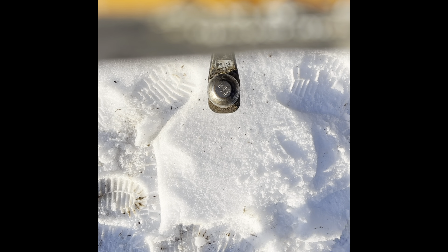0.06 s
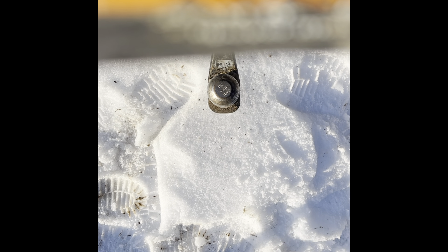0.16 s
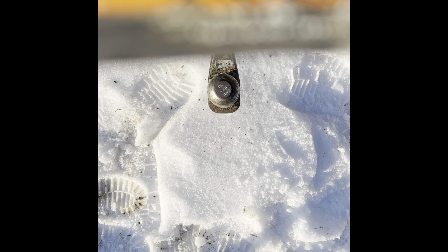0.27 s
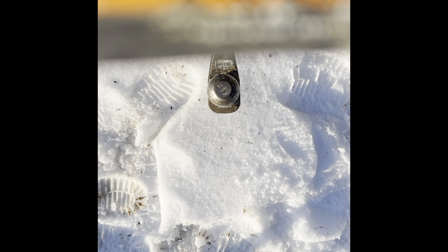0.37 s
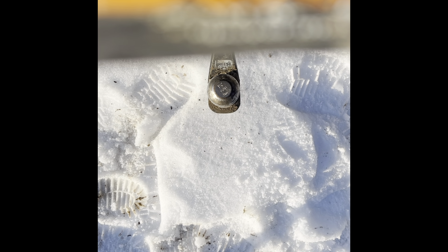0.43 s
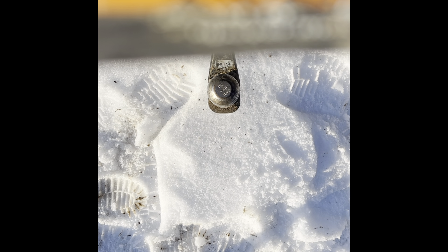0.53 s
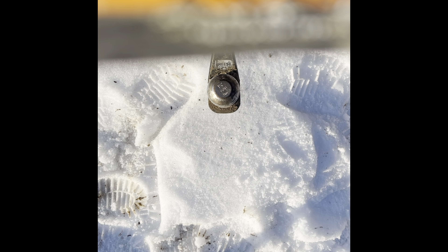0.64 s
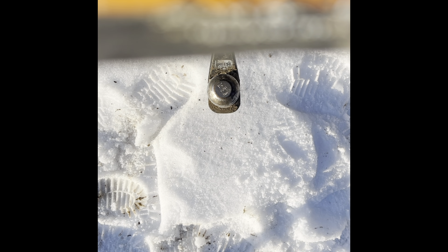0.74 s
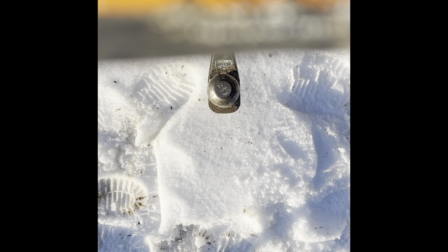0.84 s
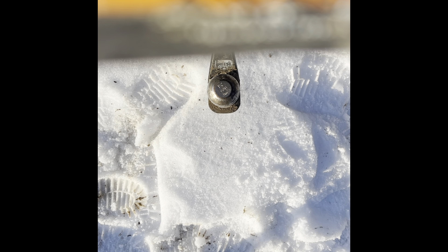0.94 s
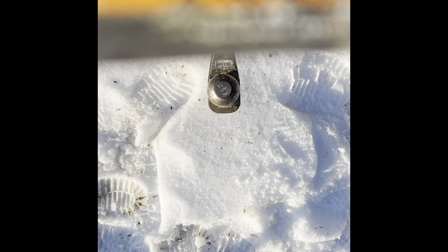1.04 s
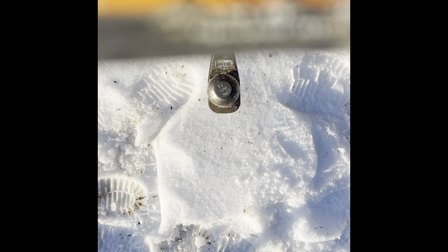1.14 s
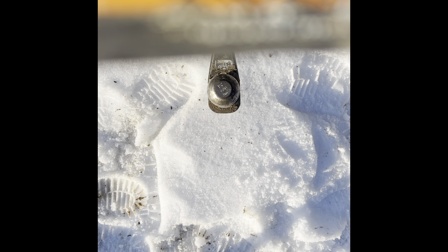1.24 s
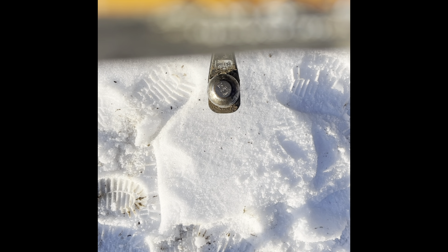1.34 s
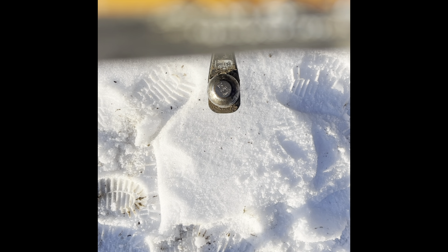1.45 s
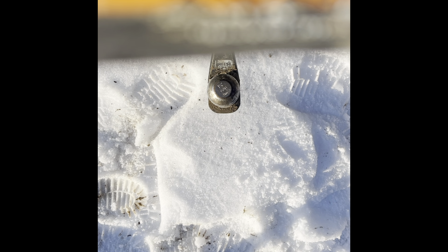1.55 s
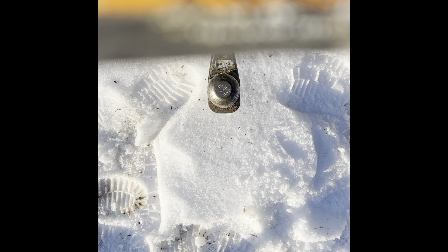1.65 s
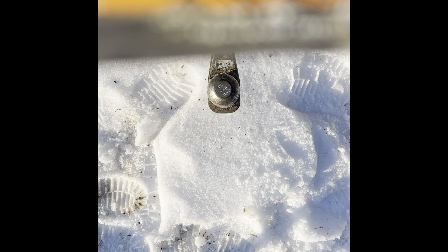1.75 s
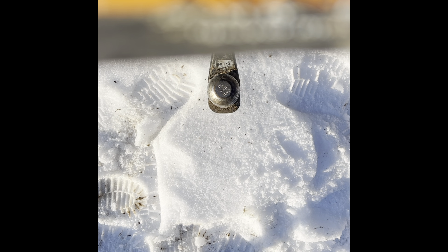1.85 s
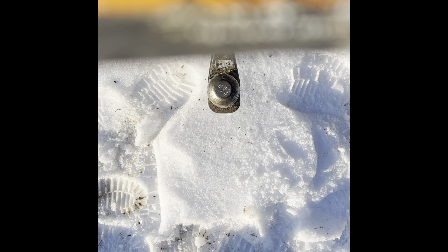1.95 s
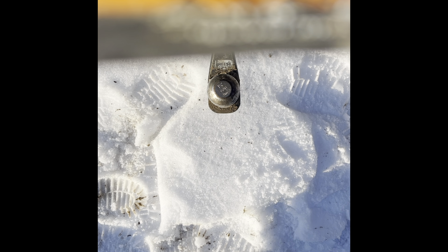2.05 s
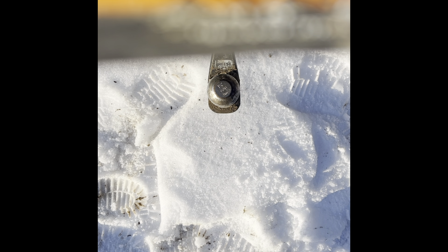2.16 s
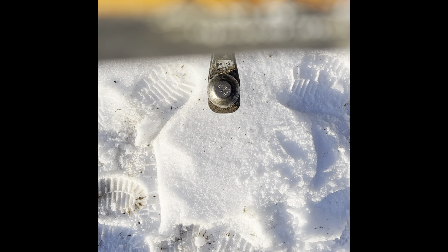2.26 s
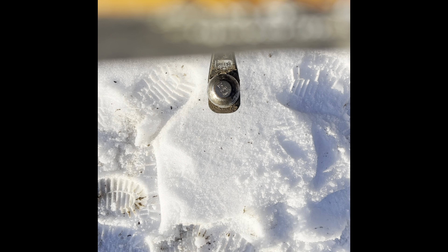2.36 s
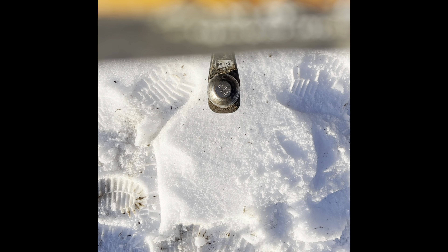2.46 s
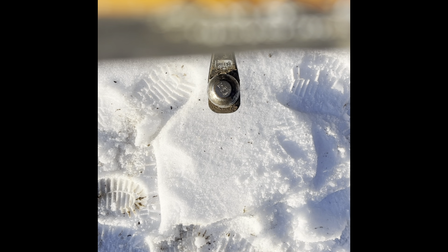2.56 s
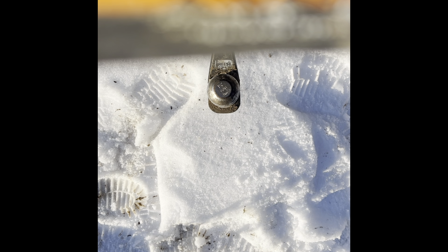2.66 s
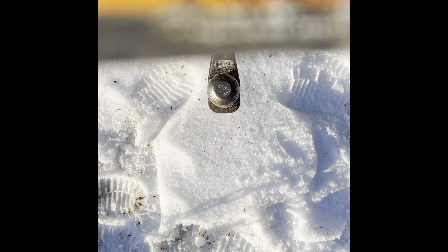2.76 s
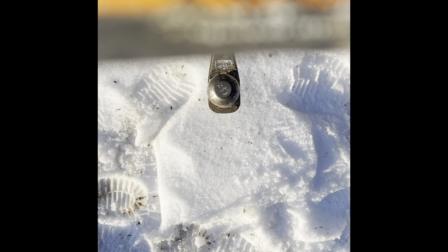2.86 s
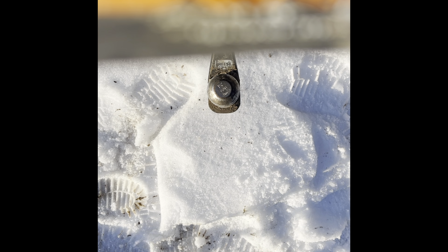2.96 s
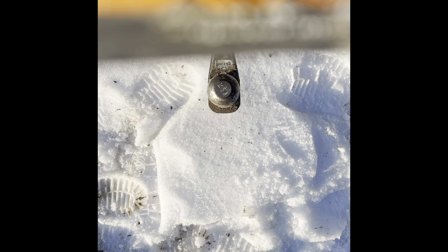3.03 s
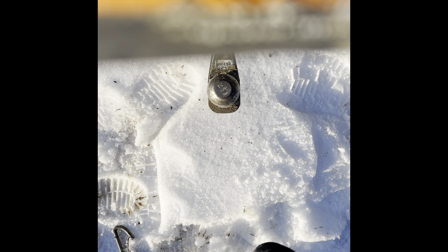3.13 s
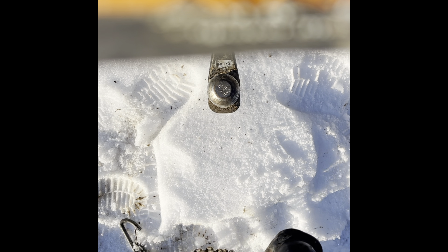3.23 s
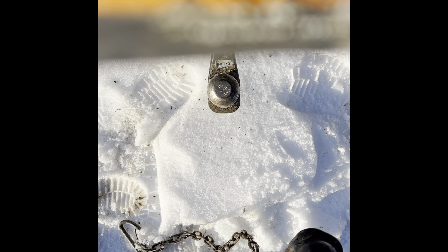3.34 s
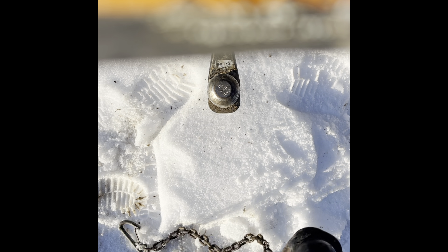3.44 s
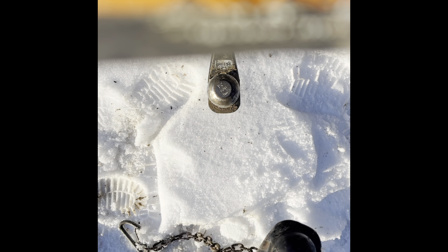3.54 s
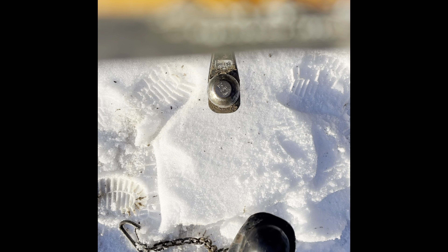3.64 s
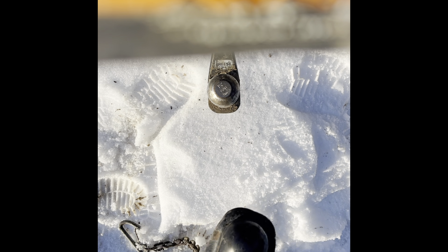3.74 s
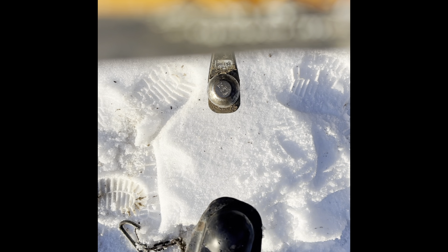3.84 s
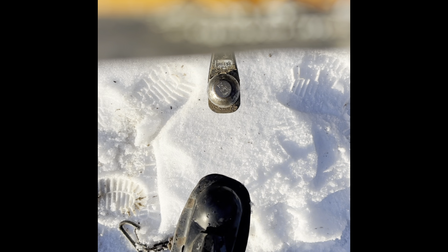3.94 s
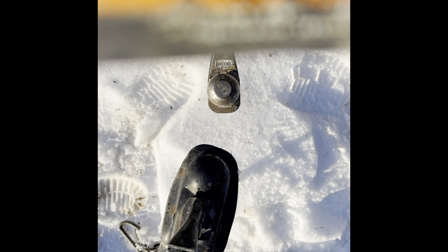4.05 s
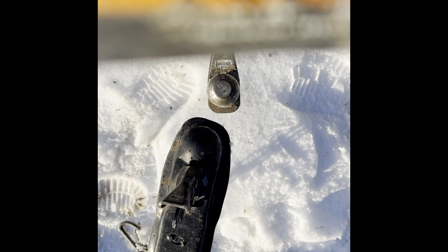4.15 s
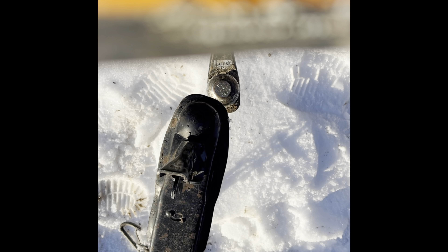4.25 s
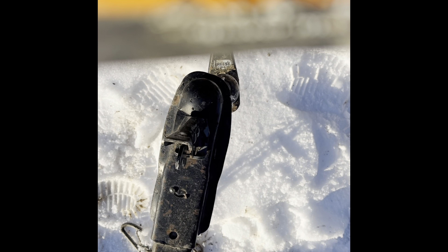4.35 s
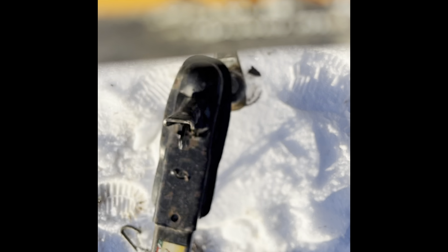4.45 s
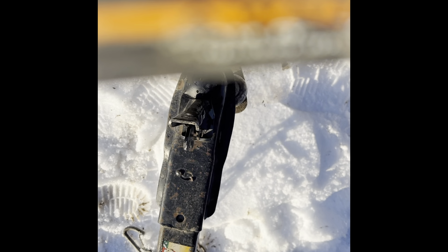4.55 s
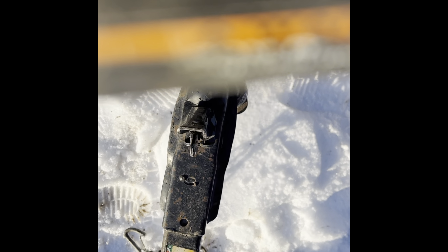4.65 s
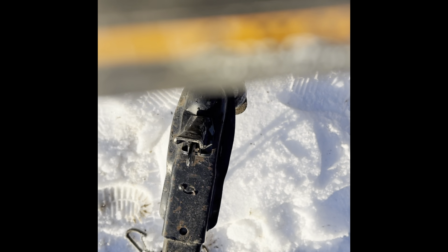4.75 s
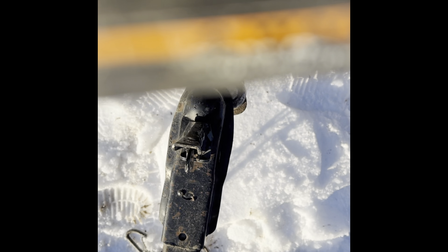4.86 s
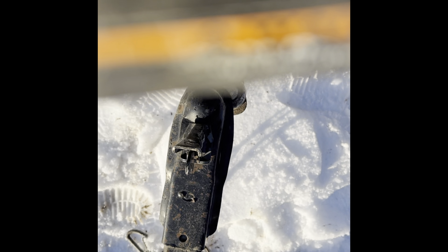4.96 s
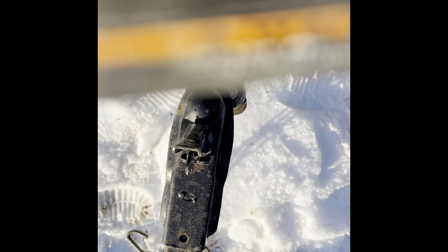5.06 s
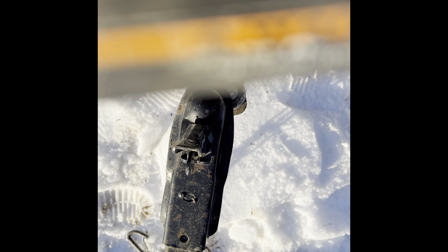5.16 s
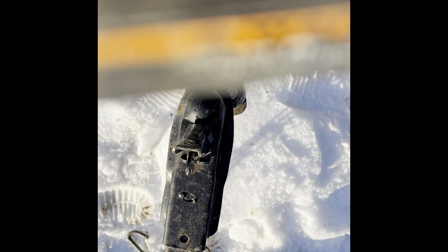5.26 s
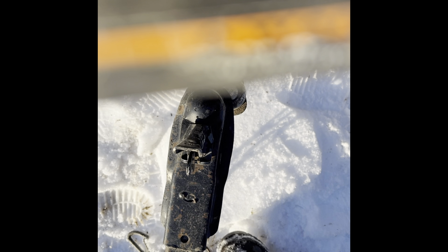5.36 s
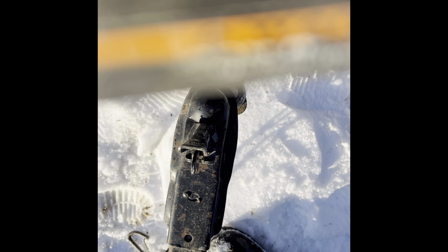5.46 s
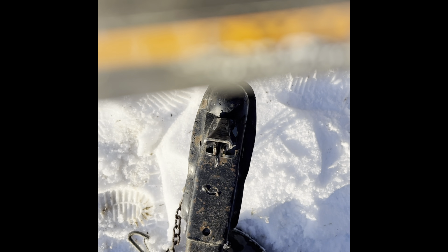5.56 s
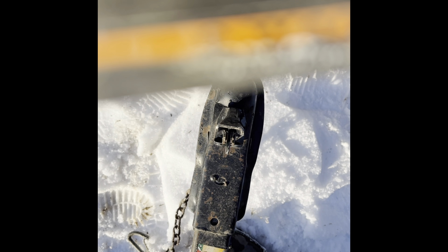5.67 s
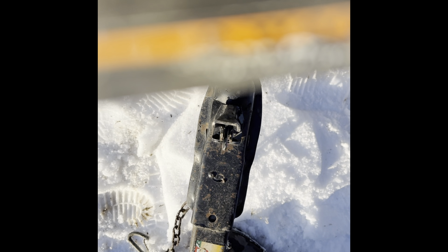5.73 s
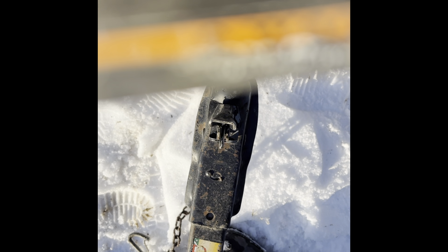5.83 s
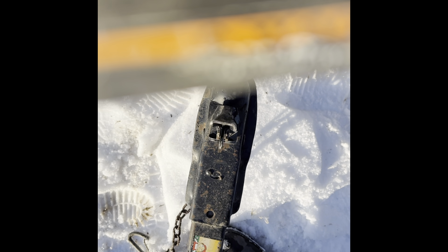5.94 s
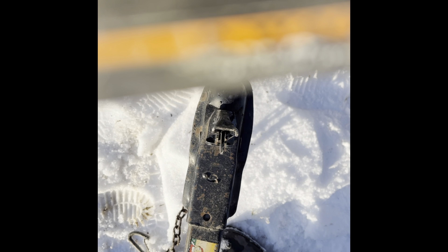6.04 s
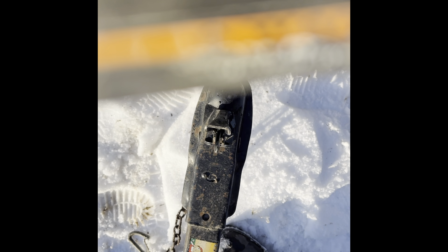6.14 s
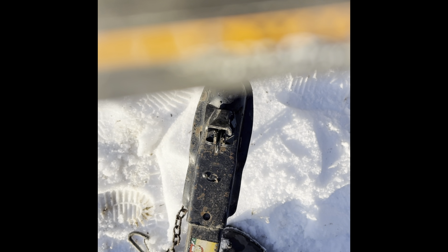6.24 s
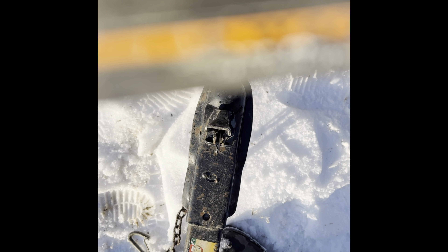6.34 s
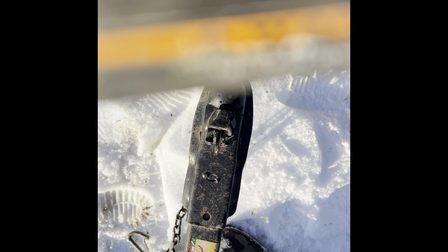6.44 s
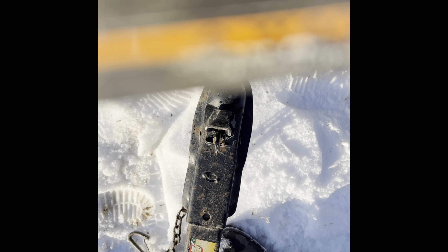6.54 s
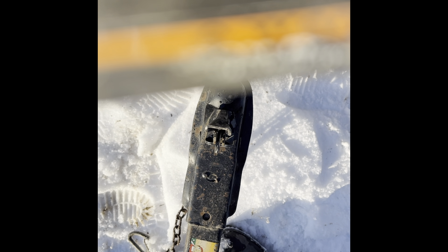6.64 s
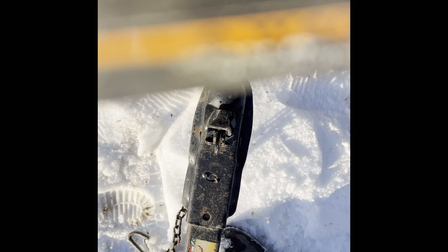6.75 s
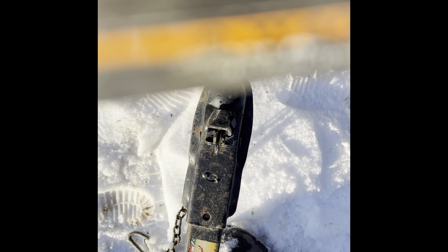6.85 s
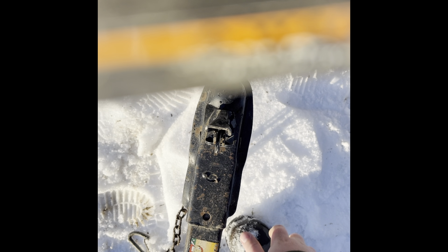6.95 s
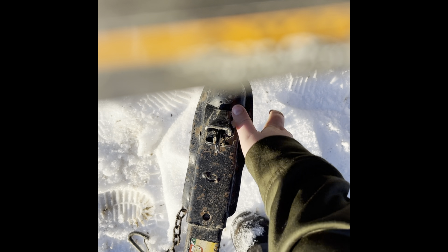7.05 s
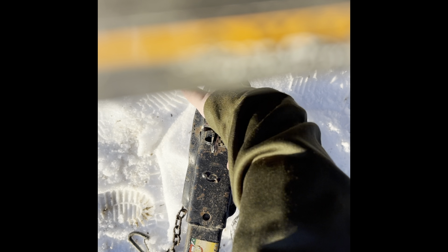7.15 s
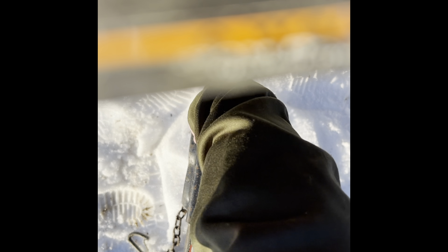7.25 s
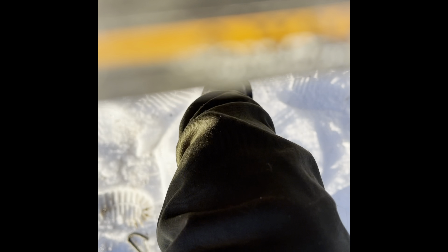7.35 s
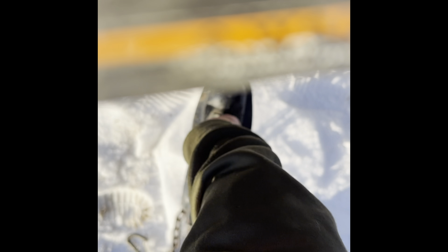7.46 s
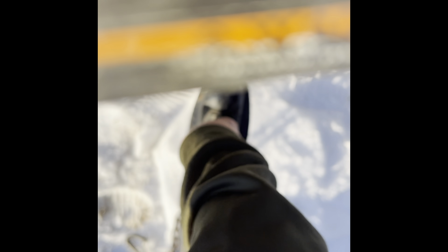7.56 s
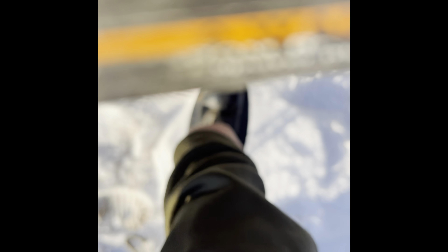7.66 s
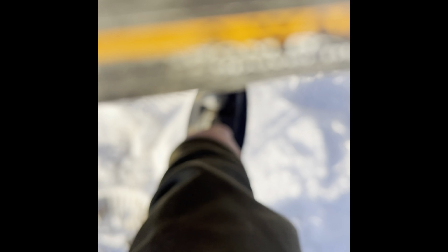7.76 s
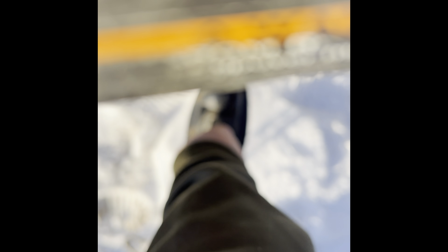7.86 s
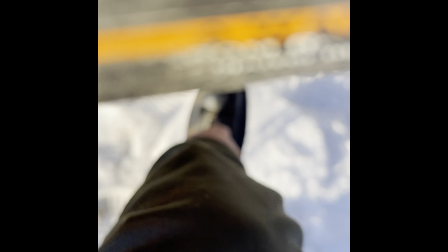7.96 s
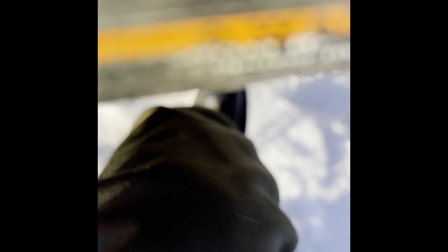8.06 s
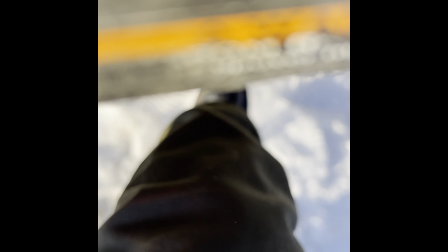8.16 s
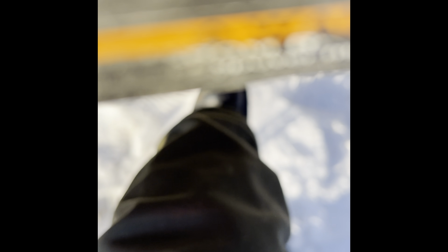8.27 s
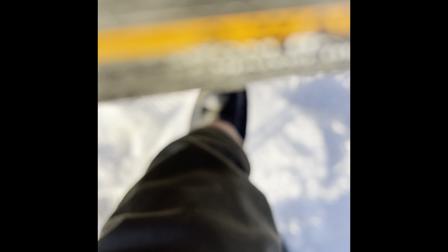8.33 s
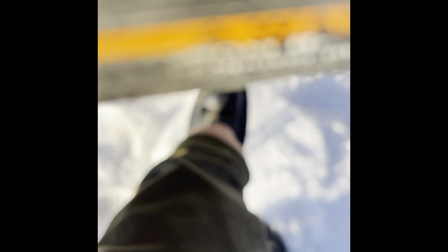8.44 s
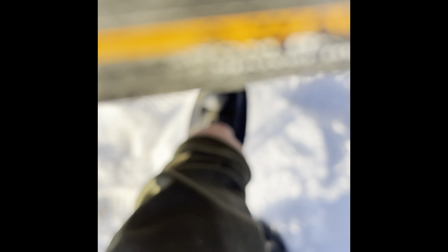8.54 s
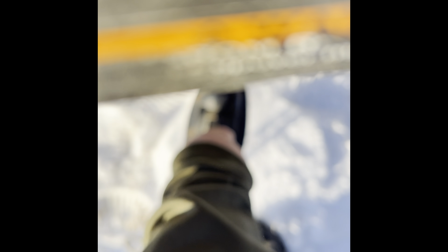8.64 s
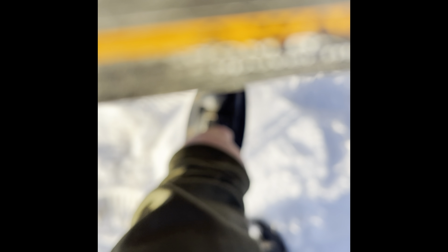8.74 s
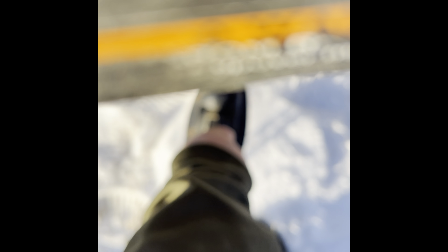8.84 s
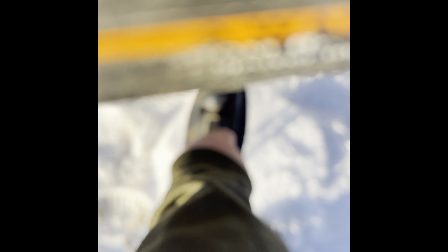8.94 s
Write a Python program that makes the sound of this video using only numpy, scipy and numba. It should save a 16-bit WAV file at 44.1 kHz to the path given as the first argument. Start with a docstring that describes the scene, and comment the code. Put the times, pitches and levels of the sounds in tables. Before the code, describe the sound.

A small trailer is coupled on snowy ground, heard close by. First come uneven snow crunches, soft swishes and light chain ticks. Then thick, hollow steel bangs arrive in a rapid tumble, booming briefly in the frame. After a quiet gap, metal grates and drops hard. Later, cloth brushes and the latch scrapes and clacks shut, amid faint air and low wind thumps.

```python
"""Coupling a trailer in snow

A small trailer is dragged over snow, its chain clinking; the steel coupler knocks, scrapes and drops onto the
hitch ball, then the latch is pushed shut. Steel is impulse-driven damped modes, soft pops and short noise;
grating steel is random slips through resonances. Boots and sleeves swish and crunch as coloured grains, and
wind rumbles on the microphone as slowly varying noise."""
import sys
import numpy as np
from scipy import signal
from scipy.fft import rfft, irfft
from scipy.io import wavfile
from scipy.ndimage import uniform_filter1d
from numba import njit

SR = 44100
rng = np.random.default_rng(int(sys.argv[2]) if len(sys.argv) > 2 else 0)


def transcribe(u):
    """Save the signal u as a 16-bit wav file named by the first command-line argument.

    u: samples, shape (n,) or (channels, n), limited to [-1, 1]; the rate is SR.
    q: integer samples, one column per channel.
    """
    v = np.clip(np.atleast_2d(u).T, -1, 1)
    q = np.round(v * 32767).astype(np.int16)
    wavfile.write(sys.argv[1], SR, q)


N = 396900  # samples, 9 s


def amp(db):
    """Decibel law: 20 dB is a factor of ten in amplitude."""
    return 10 ** (np.asarray(db) / 20)


def rms_one(x):
    """Normalisation to unit root mean square."""
    return x / np.sqrt(np.mean(x ** 2) + 1e-20)


def in_time(rows):
    """Linear interpolation of each column over the time in the first column."""
    s, *columns = np.transpose(rows)
    return [np.interp(np.arange(N) / SR, s, column) for column in columns]


def at_hz(points, hz, column=1):
    """Interpolation of one column along a logarithmic frequency axis."""
    points = np.array(points)
    return np.interp(np.log(np.maximum(hz, 1)), np.log(points[:, 0]), points[:, column])


def colour(x, spectrum):
    """Linear filtering: shapes the spectrum; white input of rms 1 stays near rms 1."""
    gain = amp(at_hz(spectrum, np.fft.rfftfreq(N, 1 / SR)))
    return irfft(rfft(x) * rms_one(gain), N)


def band_pass(x, low_hz, high_hz):
    """Band limitation by a Butterworth filter."""
    return signal.sosfilt(signal.butter(2, [low_hz, high_hz], "band", fs=SR, output="sos"), x)


def high_pass(x, hz):
    """Removal of the low frequencies by a Butterworth filter."""
    return signal.sosfilt(signal.butter(2, hz, "high", fs=SR, output="sos"), x)


def drift(rate_hz):
    """Slow random fluctuation of rms 1: noise through a double pole, at a fortieth of the sample rate."""
    r = np.exp(-80 * np.pi * rate_hz / SR)
    noise = rng.standard_normal(N // 40 + 2002)
    slow = signal.lfilter([1], [1, -2 * r, r * r], noise)[2000:]  # skips the settling
    return np.interp(np.arange(N) / 40, np.arange(len(slow)), rms_one(slow))


def grains(per_s, spread_db):
    """Shot noise: random clicks of uneven size, rms 1."""
    sizes = amp(spread_db * np.minimum(rng.exponential(1, N), 4)) * rng.standard_normal(N)
    return rms_one(sizes * (rng.random(N) < per_s / SR))


def clicks(times, gains):
    """Ideal impulses on a negligible floor."""
    out = np.full(N, 1e-18)
    out[np.round(np.asarray(times) * SR).astype(int)] = gains
    return out


def ring(x, hz, t60):
    """Damped resonator: a unit click sets a sine of initial height 1 ringing."""
    r, w = amp(-60 / (t60 * SR)), 2 * np.pi * hz / SR
    return signal.lfilter([0, np.sin(w)], [1, -2 * r * np.cos(w), r * r], x)


def strike(times, db, modes, scatter_db):
    """Modal superposition: every contact drives every mode with a strength and sign of its own."""
    chance = rng.standard_normal((len(times), len(modes), 2))
    gains = amp(db[:, None] + scatter_db * chance[..., 0]) * np.sign(chance[..., 1])
    out = 0
    for k, (hz, level_db, t60) in enumerate(modes):
        out = out + amp(level_db) * ring(clicks(times, gains[:, k]), hz, t60)
    return out


def burst(times, db, spectrum, t60):
    """Exponentially decaying noise: grit crushed at the contact starts at once and dies fast."""
    envelope = signal.lfilter([1], [1, -amp(-60 / (t60 * SR))], clicks(times, amp(db)))
    return envelope * colour(rng.standard_normal(N), spectrum)


def add(out, s, sound):
    """Superposition of a sound from a given time on."""
    start = round(s * SR)
    out[start:start + len(sound)] += sound[:N - start]


def pop(db, hz, rise):
    """Soft-contact pulse: a few cycles that swell and fade."""
    t = np.arange(round(8 * rise * SR)) / SR
    return amp(db) * np.sin(2 * np.pi * hz * t) * t / rise * np.exp(1 - t / rise)


# wind on the microphone: t/s, level/dB
WIND = [(0, -50), (1.03, -43.5), (1.45, -52), (1.75, -45.5), (2.08, -49), (2.85, -45), (3.23, -45),
        (3.81, -45), (4.6, -49.5), (4.81, -31.5), (5.26, -45), (5.81, -35.5), (6.0, -47), (6.31, -48),
        (7.42, -43), (7.79, -50.5), (8.2, -31.5), (8.4, -43), (9, -44)]
# spectra of the rumble and of the faint air noise: f/Hz, relative level/dB
RUMBLE = [(12, -59), (20, -31), (38, -16), (59, 1.5), (162, -15), (258, -33), (285, -28), (400, -22),
          (520, -62.5), (880, -120)]
AIR = [(150, 7), (500, 7), (1000, 2), (2000, -7.5), (4000, -24.5), (9000, -16), (16000, -17)]
AIR_DB = -62


def wind():
    """Modulated low-frequency noise: a lumpy rumble over a faint steady air noise."""
    rumble_db = in_time(WIND)[0] + 2 * drift(23)
    rumble = colour(rng.standard_normal(N), RUMBLE) * amp(rumble_db)
    return rumble + amp(AIR_DB) * colour(rng.standard_normal(N), AIR)


# tyres and tongue pushing through snow, beneath the strokes: t/s, swish level/dB, crunch level/dB
DRAG = [(0, -63, -62), (.5, -73, -62), (1.0, -61, -48.5), (1.4, -93, -61.5), (1.8, -68, -55.5),
        (2.1, -64, -62.5), (2.6, -62, -50), (3.0, -45.5, -60), (3.45, -52.5, -49), (3.55, -69.5, -48.5),
        (4.05, -56.5, -44.5), (4.4, -58.5, -45), (5.05, -84, -45), (5.45, -55, -50), (6.2, -71.5, -47.5),
        (6.65, -68, -60.5), (7.5, -59, -51.5), (7.9, -74.5, -53.5), (8.3, -80.5, -43.5), (9, -74, -58)]
# boots and sleeves brushing through snow, one row a stroke:
# t/s, length/s, swish level/dB, crunch level/dB, change over the stroke/dB
STROKES = [(.045, .012, -51, -69, -6), (0.103, .16, -50, -50, 13), (0.263, .16, -42, -36, -11),
           (0.57, 0.04, -59, -62, -11), (0.656, 0.054, -42, -44, -8), (0.69, 0.13, -43.5, -40, -1),
           (0.843, 0.044, -40.5, -38.5, -12), (.94, 0.019, -33.5, -31, -10.5),
           (1.054, 0.065, -35.5, -36, -16), (1.248, 0.062, -44, -41.5, -4.5),
           (1.788, 0.023, -54.5, -41.5, -0.5), (1.821, 0.12, -45, -50.5, -16.5),
           (1.99, 0.17, -59.5, -57, -2.5), (2.256, 0.048, -50, -47, -7.5), (2.707, 0.13, -46, -42, -17.5),
           (2.826, .08, -63, -41.5, -5), (2.904, 0.098, -42, -48.5, 3.5), (3.018, 0.26, -41, -39, 0.5),
           (3.326, 0.083, -46.5, -41.5, -1), (4.005, 0.038, -46.5, -34.5, -5),
           (4.803, 0.16, -53, -29.5, -9), (5.225, .1, -55, -51.5, 4), (5.33, 0.08, -51, -46.5, 5),
           (6.11, 0.015, -45, -53, -7), (6.288, 0.16, -63.5, -63, 11), (6.45, 0.085, -46, -42.5, -9),
           (6.697, 0.087, -51, -47.5, 2.5), (6.823, 0.091, -51.5, -47.5, 2.5),
           (6.919, 0.091, -45.5, -45.5, 0.5), (7.092, 0.017, -53.5, -49, 2), (7.123, 0.017, -45.5, -38, -1),
           (7.174, 0.021, -47, -44, 0.5), (7.207, 0.067, -48.5, -36, -5), (7.273, 0.18, -48.5, -43, 6.5),
           (7.463, 0.02, -42.5, -32.5, -1), (7.952, 0.07, -54.5, -43.5, -5.5), (8.232, .04, -64, -37.5, -5),
           (8.339, 0.021, -57.5, -32, -3), (8.418, .025, -68, -34, -5), (8.572, .025, -60, -39.5, -2),
           (8.59, 0.13, -57, -51, -2), (8.804, 0.082, -66.5, -57, 5.5), (8.956, .035, -62, -52.5, -6)]
STROKE_ATTACK_S, STROKE_RELEASE_S = 0.015, 0.034  # release = time to fall 20 dB


def stroke_levels():
    """Addition of powers: strokes with quick attack, sloping hold and release lie on top of the drag."""
    swish, crunch = amp(in_time(DRAG)) ** 2
    for s, length, swish_db, crunch_db, change_db in STROKES:
        t = np.arange(round((length + 3 * STROKE_RELEASE_S) * SR)) / SR
        slope_db = change_db * np.minimum(t / length, 1)
        release_db = 20 * np.maximum(t - length, 0) / STROKE_RELEASE_S
        power = (amp(slope_db - release_db) * np.minimum(t / STROKE_ATTACK_S, 1)) ** 2
        add(swish, s, amp(swish_db) ** 2 * power)
        add(crunch, s, amp(crunch_db) ** 2 * power)
    return 10 * np.log10(swish), 10 * np.log10(crunch)


# spectra of snow swish, sleeve swish, rasp (also of grating steel) and crunch: f/Hz, relative level/dB
SWISH = [(2500, -4), (4500, -5), (6500, -1.5), (9500, -1.5), (13000, -7), (16000, -3.5)]
SLEEVE = [(2500, -2), (4000, -4), (6500, -3.5), (9500, -0.5), (12500, -1), (16000, -3.5)]
RASP = [(600, 4.5), (1000, 1), (1500, 0), (2000, 3.5), (2700, -0.5), (4500, -8.5), (7000, -30)]
CRUNCH = [(90, -12), (160, 4), (350, 3), (700, 2.5), (1000, -17.5), (1600, -36)]
SLEEVE_FROM_S = 6.25  # from here on it is the sleeve that swishes
RASP_BELOW_DB, RASP_SHARE = 6.5, 0.3  # rasp lies below a blend of swish and crunch; share of the swish


def snow_motion():
    """Granular noise: fine grains swish, coarser ones rasp, the coarsest crunch in clumps."""
    swish_db, crunch_db = stroke_levels()
    rasp_db = RASP_SHARE * swish_db + (1 - RASP_SHARE) * crunch_db - RASP_BELOW_DB
    clumps = drift(36)
    fine = grains(16000, spread_db=2.0)
    before_sleeve = np.arange(N) < SLEEVE_FROM_S * SR
    swish = np.where(before_sleeve, colour(fine, SWISH), colour(fine, SLEEVE))
    sheen = high_pass(swish, 9500) * 0.4 * drift(9)  # the top of the swish comes and goes
    swish = (swish + sheen) * amp(swish_db + 1.87 * clumps)
    rasp = colour(grains(6000, spread_db=0.0), RASP)
    rasp *= amp(rasp_db + 0.47 * clumps + 0.22 * drift(30))
    crunch = colour(grains(2200, spread_db=1.0), CRUNCH)
    crunch *= amp(crunch_db + 0.44 * clumps + 0.57 * drift(25))
    return swish + rasp + crunch


# snow crust giving way: t/s, level/dB before a common offset, f/Hz
CRUST = [(0.265, -21.5, 300), (0.956, -31, 186), (1.016, -25, 560), (1.068, -24.5, 285),
         (1.799, -27.5, 220), (1.802, -22.5, 460), (2.598, -29.5, 271), (2.695, -28, 605),
         (2.838, -23.5, 585), (3.049, -24, 320), (3.108, -20, 251), (3.334, -29.5, 152),
         (3.394, -26.5, 650), (3.517, -22, 264), (3.516, -25, 620), (3.615, -24.5, 294),
         (3.696, -30.5, 265), (4.294, -23.5, 505), (4.368, -26.5, 268), (7.128, -28.5, 287),
         (7.299, -26.5, 276), (7.39, -22, 694), (7.466, -25, 536)]


def crust():
    """Brittle fracture: each break is a dull pop of a few cycles."""
    out = np.zeros(N)
    for s, db, hz in CRUST:
        add(out, s, pop(db - 6.0, hz, 1.0 / hz))
    return out


# chain touching: t/s, links level/dB, hook level/dB, before common offsets
CLINKS = [(1.833, -46, -43), (1.8473, -36, -38), (1.872, -60, -43), (1.9518, -67, -44.5),
          (2.0064, -68, -40.5), (2.026, -61, -40), (2.054, -63, -48), (2.085, -54.5, -49),
          (2.4104, -55.5, -65), (2.461, -58, -43.5), (2.54, -55, -47), (2.616, -47.5, -60),
          (2.6534, -65, -70), (2.712, -32.5, -63), (2.7188, -32, -59), (2.7304, -34.5, -60),
          (2.781, -42, -57), (2.9137, -35, -48), (2.9237, -39, -57), (2.9677, -24.5, -36),
          (4.0004, -56, -61), (6.628, -69, -57), (6.646, -71, -61), (7.137, -40, -59), (7.2004, -75, -56),
          (7.756, -49, -56), (7.836, -55, -61), (7.873, -57, -56), (7.97, -59, -65), (8.247, -44, -60),
          (8.36, -60, -48), (8.372, -69, -32), (8.423, -47, -62)]
# modes of the links and of the hook: f/Hz, level/dB, t60/s
LINKS = [(6170, 9.5, 0.023), (7660, 9, 0.014), (8370, -2, 0.098), (9300, -18, 0.033), (11170, 8, 0.044),
         (12600, -14.5, 0.054), (13700, -12, 0.015)]
HOOK = [(1750, -9, .035), (1900, -8, .04), (2100, -7, .03), (2400, -8, .022), (2900, -10, .018),
        (3200, -11, .02), (3450, -13, .02)]
# spectrum of the contact crack of chain and steel: f/Hz, relative level/dB
CRACK = [(1000, 13), (2500, -0.5), (5000, 10), (10000, 5.5), (16000, -5)]
HOOK_RATTLE_S = .03  # the hook touches three more times within this span


def chain():
    """Modal scaling with size: small links tick and ring high, the hook chinks lower and rattles."""
    s, links_db, hook_db = np.transpose(CLINKS)
    ticks = burst(s, links_db - 2, CRACK, t60=.018)
    links = strike(s, links_db - 13, LINKS, scatter_db=5.)
    later = rng.random((len(s), 4)) * [0, 1, 1, 1]
    touches = s[:, None] + HOOK_RATTLE_S * later
    touch_db = hook_db[:, None] - 8 * later  # later touches are weaker
    return ticks + links + strike(touches.ravel(), touch_db.ravel(), HOOK, scatter_db=3.0)


# dry hollow clacks of the coupler cup and the latch lever: t/s, level/dB, f/Hz
CLACKS = [(4.649, -8, 1310), (4.658, -16, 1340), (5.729, -36, 1190), (5.808, -44, 1220), (5.982, -28, 1640),
          (7.199, -44, 3390), (7.734, -40, 1230), (7.756, -39.5, 1126), (7.787, -43, 915),
          (8.289, -55, 3340), (8.355, -51, 3080), (8.371, -43, 3220)]
# partials of the cup: multiple of the clack's f, level/dB
CUP = [(1.001, 3), (1.329, -2), (1.8, -9.5)]
CLACK_RISE_S, CLACK_SHARPENS = .0022, .028  # rise at -40 dB, shrink per dB


def clacks():
    """Heavily damped cavity: a few cycles of the cup's air and shell; harder clacks rise faster."""
    out = np.zeros(N)
    for s, db, hz in CLACKS:
        rise = CLACK_RISE_S * np.exp(-CLACK_SHARPENS * (db + 40))
        for multiple, mode_db in CUP:
            add(out, s, pop(db + mode_db, multiple * hz, rise))
    return out


# the loose latch is struck and rings on: t/s, level/dB
LATCH_FREE = [(6.008, -22), (6.217, -56)]
# modes of the latch: f/Hz, level/dB, t60/s
LATCH = [(1680, -9, .4), (1728, -11, .3), (1857, -3, .18), (1900, -8, .12), (1960, 0, .2), (2050, -6, .1),
         (13050, -10, .16)]
# squeak of the latch pivot: t/s, rise/s, level/dB before wavering, f/Hz
SQUEAK = (8.712, .022, -50, 1965)


def latch():
    """Free vibration: the loose latch rings on its own modes; its pivot gives one short wavering squeak."""
    s, db = np.transpose(LATCH_FREE)
    out = strike(s, db, LATCH, scatter_db=1.)
    at, rise, squeak_db, hz = SQUEAK
    squeak = pop(squeak_db, hz, rise)
    add(out, at, squeak * amp(7.2 * drift(60)[:len(squeak)]))
    return out


@njit
def glide(x, hz, r, sr):
    """Time-varying resonator: a two-pole resonance whose centre moves."""
    out = np.zeros(len(x))
    for i in range(2, len(x)):
        feedback = 2 * r * np.cos(2 * np.pi * hz[i] / sr) * out[i - 1] - r * r * out[i - 2]
        out[i] = x[i] - x[i - 2] + feedback
    return out


# steel grating on steel: scrapes, and in the third list the grinding tail of the slam:
# t/s, groan level/dB, squeal level/dB before the mix of squeal and rasp, squeal centre f/Hz
GRATING = [
    [(5.52, -42, -42.5, 1476), (5.604, -27, -30.5, 1310), (5.64, -38, -35.5, 2200),
     (5.714, -39, -26.5, 2040), (5.774, -34, -43, 1760), (5.802, -41, -40, 1130), (5.854, -45, -48, 1440),
     (5.892, -71, -48, 1100), (5.9, -27, -63, 1085)],
    [(7.66, -70, -52, 1715), (7.69, -38.5, -34, 1450), (7.796, -43, -60, 1063), (7.822, -56, -69, 1060),
     (7.84, -45, -55, 1070), (7.86, -40, -68, 1316)],
    [(8.15, -19, -28, 1366), (8.188, -38.5, -34, 1320), (8.254, -31, -33.5, 1150),
     (8.326, -38, -43.5, 1360), (8.342, -48, -53, 1780), (8.37, -36, -35, 1980), (8.4, -40, -46, 1820),
     (8.45, -50, -49.5, 1130)],
    [(8.55, -64, -55, 1250), (8.564, -38, -41.5, 1290), (8.586, -60, -44, 1440), (8.618, -63, -35, 2280),
     (8.664, -56, -41, 2180), (8.7, -58, -51, 1410)],
]
# modes of the trailer tongue, for grating and blows: f/Hz, level/dB, t60/s
TONGUE = [(292, -6.5, 0.022), (360, -20, 0.014), (422, 7, 0.067), (447, 3, 0.037), (534, -7.5, 0.11),
          (551.5, 4.5, 0.055), (650, -2.5, 0.1), (696, -7, 0.11), (778.6, 1, 0.064)]


def grating():
    """Frictional excitation: uneven slips drive the tongue's modes, a squeal of wandering pitch and a rasp."""
    groan_db, squeal_db, squeal_hz = in_time(np.concatenate(GRATING))
    t = np.arange(N) / SR
    contact = sum((t > rows[0][0]) & (t < rows[-1][0]) for rows in GRATING) * 1.
    touching = uniform_filter1d(contact, size=400)  # softens the edges
    slips = grains(1200, spread_db=-0.5)
    hum = sum(amp(db) * ring(slips, hz, 1.4 * t60) for hz, db, t60 in TONGUE)
    groan = rms_one(band_pass(hum, low_hz=208, high_hz=1200))
    squeal = rms_one(glide(slips, squeal_hz, np.exp(-np.pi * 180 / SR), SR))  # bandwidth 180 Hz
    rough = colour(slips, RASP)
    return touching * (amp(groan_db) * groan + amp(squeal_db) * (0.19 * squeal + 0.28 * rough))


def clank(db, hz, t60, noise):
    """Band-limited decaying noise: contact noise gathered around one pitch."""
    t = np.arange(len(noise)) / SR
    band = rms_one(band_pass(noise, hz / 1.5, hz * 1.5))
    return amp(db - 60 * t / t60) * np.minimum(t / 0.003, 1) * band


# rattle of body panels after a blow: f/Hz, level/dB before a common offset, t60/s
AFTER = [(55, -32, .8), (95, -11.5, .9), (156, -21, 1.), (290, -31.5, 0.89), (456, -41.5, .9),
         (760, -31, .9), (1300, -33.5, 1), (2070, -23.5, 0.41), (4000, -27.5, 0.32), (12000, -33, 0.15)]


def panels(x):
    """Convolution with a diffuse decay: noise that dies band by band, set off by each blow."""
    t, tail = np.arange(SR) / SR, 0
    edges = 50 * 2 ** np.arange(0, 8.4, .5)  # half octaves
    for low, high in zip(edges, edges[1:]):
        band = band_pass(rng.standard_normal(SR), low, high)
        hz = np.sqrt(low * high)
        decay_db = 60 * t / at_hz(AFTER, hz, column=2)
        tail = tail + band * amp(at_hz(AFTER, hz) - decay_db)
    return signal.fftconvolve(x, tail * np.minimum(t / 0.0099, 1))[:N]


# steel on steel: t/s, knock level/dB, knock f/Hz, frame boom level/dB, clank level/dB, crack level/dB
BLOWS = [(4.41, -22.5, 860, -52, -34, -43), (4.418, -7.5, 477, -42, -14.5, -16),
         (4.421, -16, 368, -20, -12, -35), (4.436, -10.5, 290, -34.5, -35, -24),
         (4.442, -2, 438, -22, -22, -31), (4.446, -17, 268, -8.5, -27, -13),
         (4.453, -3.5, 435, -14, -19.5, -50), (4.462, -9, 376, -38, -40, -51),
         (4.486, -5.5, 537, -40, -21, -26), (4.5, -9, 630, -24, -50, -64), (4.51, -14, 407, -48, -42, -61),
         (4.537, -44, 283, -33, -31, -28), (4.65, -12, 272, -19.5, -40, -35),
         (4.658, -7, 600, -59, -68, -78), (4.695, -14, 277, -47, -19, -27.5),
         (4.714, -15.5, 298, -17.5, -24.5, -55), (4.72, -18, 413, -21, -45, -25.5),
         (4.733, -42, 289, -45, -20.5, -23.5), (4.737, -10, 382, -39, -18, -20.5),
         (4.797, -22, 313, -38, -23.5, -29), (5.522, -24.5, 268, -72, -47, -39),
         (5.657, -40, 408, -25, -23, -34), (5.705, -36, 300, -28, -26.5, -36),
         (5.575, -23.5, 420, -43, -34, -58), (5.61, -26.5, 507, -31, -37.5, -58),
         (5.754, -22.5, 395, -18, -82, -70), (5.803, -32, 520, -22.5, -47, -52),
         (5.908, -12, 770, -30, -10.5, -21), (5.917, -8, 470, -18, -20, -17.5),
         (5.93, -14, 290, -32, -27, -42), (5.939, -13, 400, -12, -15, -14),
         (5.955, -0.5, 427, -22, -21, -31), (5.984, -11.5, 367, -39, -26, -37),
         (6.004, -30, 400, -12.5, -17, -15), (6.217, -42, 286, -34, -40, -67),
         (7.639, -53, 516, -58, -31, -34.5), (7.696, -25.5, 455, -38, -35.5, -41),
         (7.731, -30, 547, -35, -53, -48), (7.754, -35, 280, -31, -59, -49),
         (7.831, -28, 420, -39, -65, -70), (8.001, -30, 405, -50, -35.5, -75),
         (8.032, -30.5, 785, -31, -32, -70), (8.088, -31, 455, -40, -24, -37),
         (8.099, -9.5, 745, -15.5, -11, -41), (8.104, -6, 787, -28, -21, -38),
         (8.11, -8, 440, -24, -26, -44), (8.12, -5.5, 397, -44, -40, -40), (8.135, -14, 390, -16, -27, -48),
         (8.148, -35, 700, -31, -32, -45.5), (8.352, -37, 440, -41, -31.5, -59),
         (8.56, -21.5, 770, -59, -38.5, -53.5)]
# modes of the frame and of the coupler: f/Hz, level/dB (coupler: before a common offset), t60/s
FRAME = [(78, -9, .14), (101, 0, .2), (135, -8, .1), (160, -4, .08), (195, -11, .3)]
COUPLER = [(1071, -8, 0.06), (1123, -7.5, 0.014), (1380, -10, 0.013), (1788, -13, 0.048), (1885, -13, .1),
           (1960, -15, .12), (2085, -14.5, 0.12), (2240, -15, 0.09), (2370, -18, 0.08), (2975, -7, .045),
           (3180, -5, 0.045), (3520, -3, 0.05), (4080, -16, .03)]
KNOCK_OVERTONE, OVERTONE_DB = 1.75, -9  # the tongue's second bending note, as a multiple of the knock pitch
KNOCK_RISE_CYCLES, CLANK_HZ, CLANK_T60_S = 0.66, 1900, 0.063


def steel():
    """Impact excitation: a blow knocks, hums in the tongue, booms in the frame, clanks in the coupler, cracks."""
    s, knock_db, _, boom_db, _, crack_db = np.transpose(BLOWS)
    knocks, clanks = np.zeros(N), np.full(N, 1e-18)
    grit = rng.standard_normal((len(s), SR // 5))
    for (at, knock, knock_hz, _, clank_db, _), noise in zip(BLOWS, grit):
        rise = KNOCK_RISE_CYCLES / knock_hz
        add(knocks, at, pop(knock, knock_hz, rise))
        add(knocks, at, pop(knock + OVERTONE_DB, KNOCK_OVERTONE * knock_hz, rise))
        add(clanks, at, clank(clank_db, CLANK_HZ, CLANK_T60_S, noise))
    hum = band_pass(strike(s, knock_db - 15.0, TONGUE, scatter_db=2.5), low_hz=217, high_hz=1090)
    coupler = 0
    for k, (hz, db, t60) in enumerate(COUPLER):
        coupler = coupler + amp(db) * ring(clanks, hz, t60) * (-1) ** k  # alternating sign
    cracks = burst(s, crack_db, CRACK, t60=0.073)
    hit = knocks + hum + clanks + amp(-30.5) * coupler + cracks
    pushes = clicks(s, amp(boom_db))  # the frame is always pushed the same way
    boom = sum(amp(db) * ring(pushes, hz, t60) for hz, db, t60 in FRAME)
    boom = band_pass(boom, low_hz=54, high_hz=280)
    return hit + boom + amp(-18.0) * panels(hit)


# phase between the two channels: f/Hz, left lead/rad
PHASE = [(0, 0), (780, 1.3), (1150, -.3), (1850, 0), (2760, -2.2), (3800, -.9), (4570, -1.8), (5400, -3.14),
         (6370, -4.3), (8400, -5.), (10400, -6.2), (17000, -6.3)]
# depth of the random phase wavering: f/Hz, level/dB
WAVER = [(60, -14), (300, -13), (1000, -9), (2800, -12), (4500, -22), (7000, -22), (10000, -17),
         (16000, -18)]
# level between the two channels: f/Hz, left minus right/dB
SIDES = [(60, -0.5), (180, -1), (550, 1), (1650, 2), (4970, 1), (15000, 0)]


def stereo(x):
    """Interchannel coherence: channels differ in phase and level; a little random phase wavering widens them."""
    hz = np.fft.rfftfreq(N, 1 / SR)
    side = np.array([[1], [-1]])  # left, right
    waver = 1j * side * rfft(x * drift(35)) * amp(at_hz(WAVER, hz))
    offset = np.exp(.5j * side * np.interp(hz, *np.transpose(PHASE)))
    balance = amp(side * at_hz(SIDES, hz) / 2)
    return irfft((rfft(x) + waver) * offset * balance, N)


def scene():
    """Superposition of all sources, spread over two channels."""
    background = wind() + snow_motion() + crust()
    metal = chain() + clacks() + latch() + grating() + steel()
    return stereo(background + metal)


MIC_LOW_HZ, CUTOFF_HZ = 59, 16620


def record(dry):
    """Band limits and saturation: the microphone drops the deep bass, peaks are rounded, the top is cut."""
    rounded = np.tanh(high_pass(dry, MIC_LOW_HZ))
    return signal.sosfilt(signal.cheby2(14, 70, CUTOFF_HZ, fs=SR, output="sos"), rounded)


dry = scene()
out = record(dry)
transcribe(out)
```